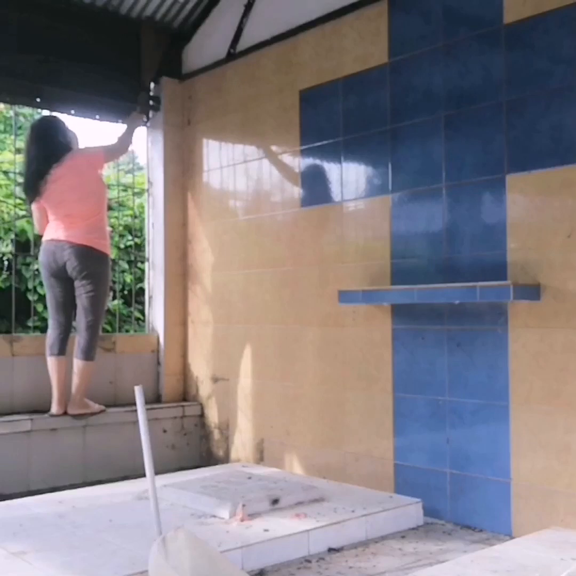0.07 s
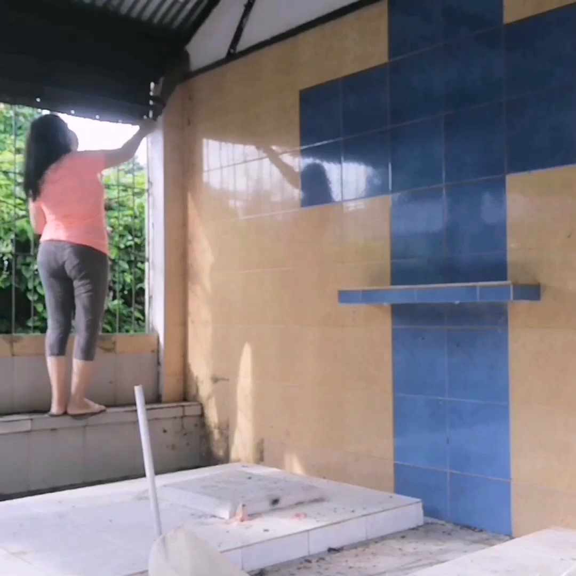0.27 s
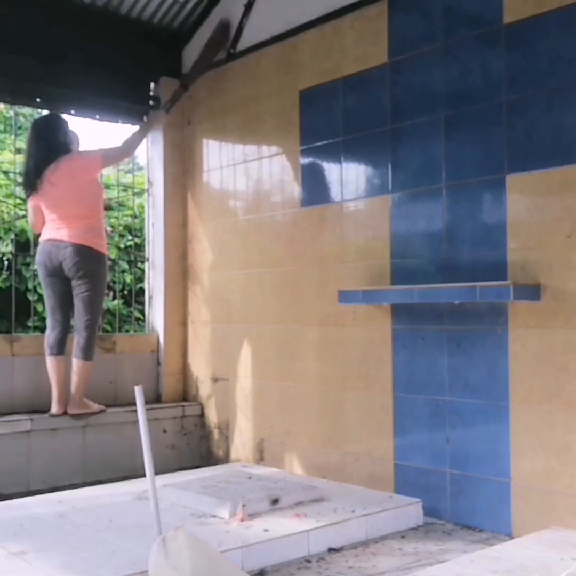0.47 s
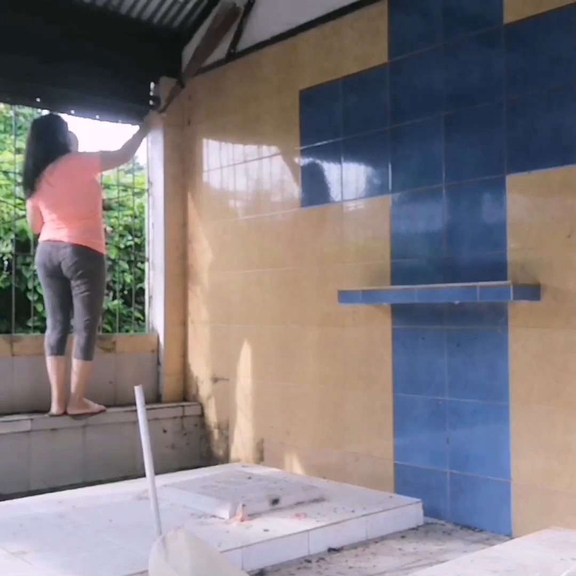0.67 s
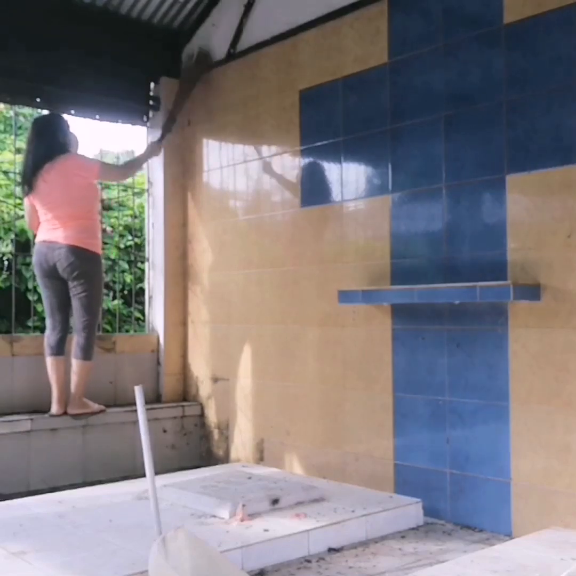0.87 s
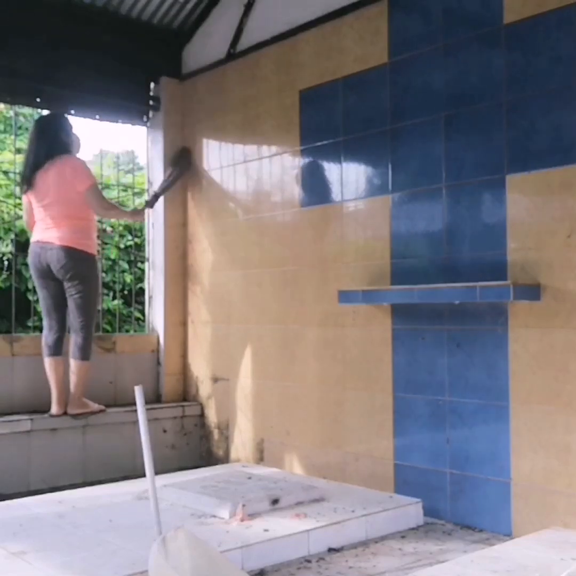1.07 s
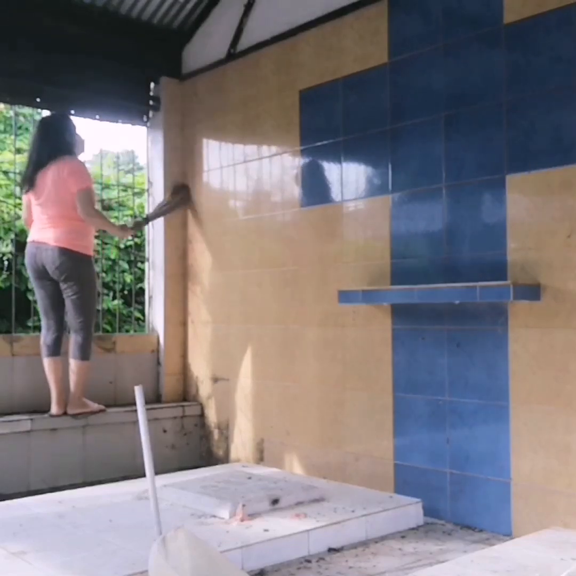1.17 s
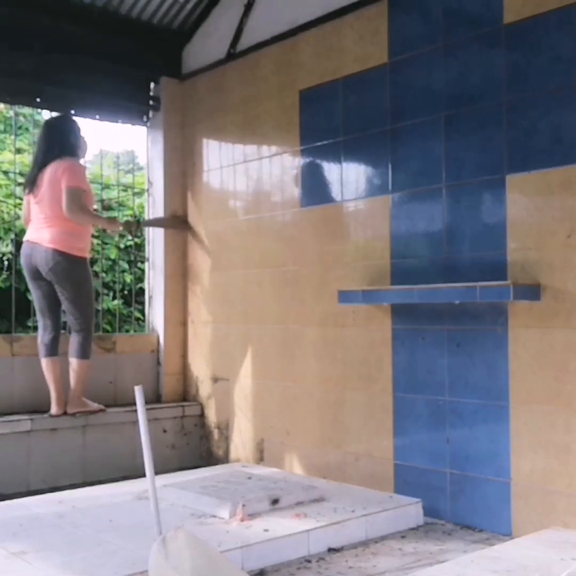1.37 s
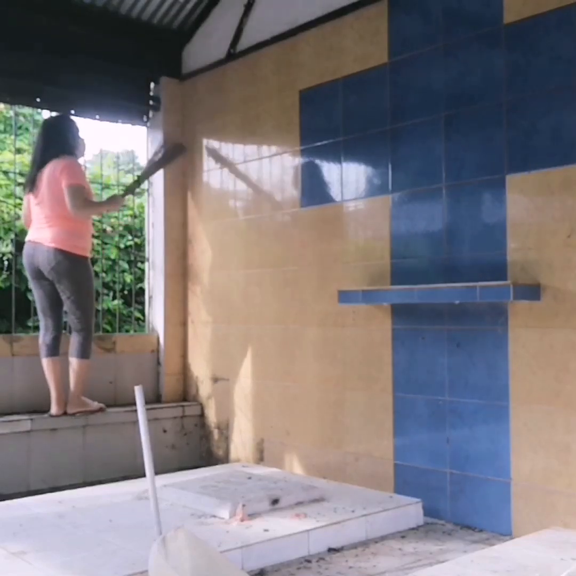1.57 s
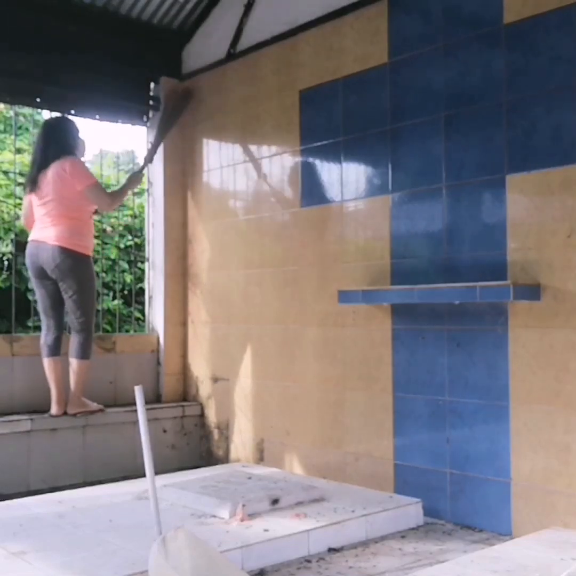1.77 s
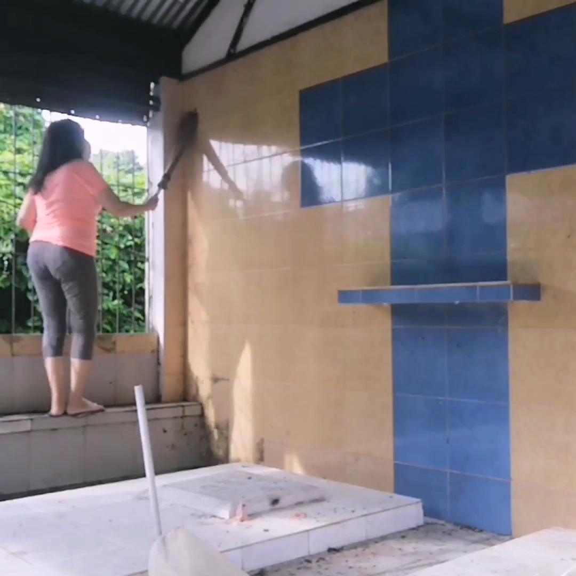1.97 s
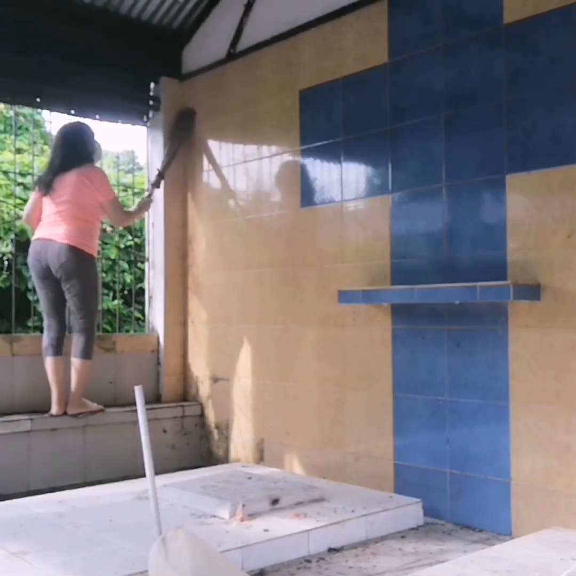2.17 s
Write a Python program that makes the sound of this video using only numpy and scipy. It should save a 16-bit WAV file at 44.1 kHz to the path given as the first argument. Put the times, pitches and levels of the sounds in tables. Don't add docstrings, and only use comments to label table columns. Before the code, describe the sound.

A long-handled straw broom brushes lightly, bumps woodenly, then scratches along a beam and wall top, slaps a pillar and drags faintly over tile; open-sided stone hall, a few metres from a stereo microphone pair, faint outdoor hum.

```python
import sys
import numpy as np
from scipy import signal
from scipy.fft import rfft, irfft
from scipy.io import wavfile
from scipy.ndimage import uniform_filter1d

SR = 44100
rng = np.random.default_rng(int(sys.argv[2]) if len(sys.argv) > 2 else 0)


def persist_wave(psi):
    counts = np.round(np.clip(psi, -1, 1) * 32767).astype(np.int16)
    wavfile.write(sys.argv[1], SR, np.atleast_2d(counts).T)


def attenuation_scalar(level_db):
    decades = np.asarray(level_db, float) / 20
    return 10 ** decades


N = 98343
T = np.arange(N) / SR


def level(x, db):
    return x * attenuation_scalar(db) / np.sqrt(np.mean(x ** 2))


def band(x, hz, width_hz):
    return signal.lfilter(*signal.iirpeak(hz, hz / width_hz, SR), x)


def lowpass(x, hz):
    return signal.sosfiltfilt(signal.butter(2, hz, fs=SR, output="sos"), x)


def colour(x, points):
    f = np.fft.rfftfreq(x.shape[-1], 1 / SR)
    hz, db = np.array(points, float).T
    gain = attenuation_scalar(np.interp(np.log(f + 1), np.log(hz), db))
    return irfft(rfft(x) * gain, x.shape[-1])


def walk(rate):
    k = int(SR / rate)
    held = np.repeat(rng.standard_normal(N // k + 1), k)
    return 1.3 * uniform_filter1d(uniform_filter1d(held, k), k)[:N]


def ports(x):
    low = lowpass(x, 680)
    same, apart = 0.9 * low[0], 0.36 * low[1]
    return x - low + same + apart * np.array([[1], [-1]])


# (frequency [Hz], level per Hz [dB])
AIR_COLOUR = [(25, -6.5), (110, -5), (260, -16), (940, -16), (1300, -27), (2300, -25), (3700, -29),
              (6500, -33.5), (9000, -34.5), (15400, -42)]


def outdoor_air():
    noise = rng.standard_normal((2, N))
    return level(ports(colour(noise, AIR_COLOUR)), -59.5) * attenuation_scalar(walk(7.7))


def traffic_rumble():
    noise = ports(rng.standard_normal((2, N)))
    return level(band(band(noise, 71, 100), 71, 100), -65)


def motor_hum():
    hum_hz, width_hz = 153.6, 130
    noise = rng.standard_normal(N)
    hum = level(band(band(noise, hum_hz, width_hz), hum_hz, width_hz), -76)
    pitch_hz = hum_hz + 1.6 * walk(10.1)
    strength = attenuation_scalar(-58.5 + 1.5 * walk(9.13))
    return hum + strength * np.sin(2 * np.pi * np.cumsum(pitch_hz) / SR)


def drone():
    return level(band(rng.standard_normal(N), 900, 51), -78.5) * attenuation_scalar(3.5 * walk(12.8))


# (time [s], length [s], start pitch [Hz], end pitch [Hz], level [dB])
BIRD_NOTES = [
    (1.92, 0.049, 1970, 1970, -69),
    (2.045, .025, 2000, 2250, -68),
    (2.087, 0.042, 866, 1000, -63),
    (2.123, 0.099, 2300, 2250, -67.5),
]


def birds():
    out = np.zeros(N)
    for s, length, from_hz, to_hz, db in BIRD_NOTES:
        u = np.clip((T - s) / length, 0, 1)
        pitch_hz = from_hz + (to_hz - from_hz) * u
        out += attenuation_scalar(db) * np.sin(np.pi * u) * np.sin(2 * np.pi * np.cumsum(pitch_hz) / SR)
    return out


def insects():
    hz, width_hz = 5050, 940
    from_s, rise_s, until_s, fall_s = 1.95, 0.096, 2.23, 0.1
    swell = np.clip(np.minimum((T - from_s) / rise_s, (until_s - T) / fall_s), 0.1, 1)
    noise = rng.standard_normal((2, N))
    return level(band(band(noise, hz, width_hz), hz, width_hz), -70.5) * swell


def outdoors():
    return outdoor_air() + traffic_rumble() + motor_hum() + drone() + birds() + insects()


def hall(x):
    t60_s, delay_s, shift_s = 0.18, 0.0025, 0.03
    t, hop = np.arange(int(0.4 * SR)) / SR, int(shift_s * SR)
    fade = attenuation_scalar(-60 * t / t60_s) * np.clip(t / delay_s, 0, 1)
    fade = fade / np.sqrt(np.sum(fade ** 2))
    window = np.sqrt(np.hanning(2 * hop))
    out, padded = np.zeros((2, N + SR)), np.pad(x, (hop, 2 * hop))
    for a in range(0, N + hop, hop):
        echo = ports(rng.standard_normal((2, len(t)))) * fade
        moment = padded[a:a + 2 * hop] * window
        part = signal.fftconvolve(moment[None], echo, axes=1)
        out[:, a:a + part.shape[1]] += part
    return out[:, hop:hop + N]


# (time [s], pitch [Hz], level
# [dB], fade [cycles per 60 dB])
BUMPS = [(0.152, 267, -54.5, 33), (.172, 280, -49, 15), (0.188, 356, -43.5, 12), (.198, 364, -41, 36),
         (0.223, 387, -53, 30), (0.226, 280, -42.5, 13), (0.251, 231.5, -42, 34), (.25, 665, -40.5, 31),
         (.265, 780, -40.5, 25), (.285, 680, -35, 20), (.32, 595, -42, 32), (.262, 315, -32.5, 7.1),
         (0.247, 107.4, -42.5, 20), (.272, 348, -33, 15), (.292, 432, -34.5, 29), (0.309, 86, -39.5, 18),
         (0.324, 236, -37.5, 16.5), (0.351, 109, -40, 17), (.375, 230, -41, 9.9), (0.396, 109, -39.5, 6.7),
         (0.476, 95, -44, 17), (.61, 105.5, -50.5, 16), (.47, 252, -51, 42), (.56, 319.5, -54.5, 72),
         (0.661, 293, -59.5, 33), (.895, 505, -53, 95), (.882, 720, -49, 53), (.85, 1588, -42.5, 150),
         (0.882, 1340, -46, 220), (0.901, 1740, -42.5, 390), (0.976, 1680, -56, 120),
         (1.041, 1532, -52, 120), (1.091, 1590, -60, 90), (.86, 280, -57, 52), (0.931, 225, -59, 130),
         (1.07, 330, -53, 23), (1.1, 230, -54.5, 19), (1.159, 330, -49.5, 28), (1.214, 575, -48, 70),
         (1.226, 562, -41, 145), (.3, 303, -43, 42), (1.305, 600, -49, 40), (1.358, 560, -52.5, 63),
         (1.242, 1610, -45, 126), (1.265, 2174, -51, 110), (1.371, 252, -58.5, 120), (1.47, 556, -65, 93),
         (1.49, 351, -66, 41), (.5, 1820, -44, 120), (.56, 1487, -45.5, 91), (0.781, 1137, -52.5, 120),
         (1.031, 230, -54.5, 27)]


def knocks():
    rise_share = 0.12
    out = np.zeros(N)
    for s, hz, db, cycles in BUMPS:
        a = int(s * SR)
        b = a + int(1.5 * cycles / hz * SR)
        turns = np.maximum(T[a:b] - s, 0) * hz
        rise = np.sin(np.pi / 2 * np.minimum(turns / (rise_share * cycles), 1)) ** 2
        out[a:a + len(turns)] += attenuation_scalar(db - 60 * turns / cycles) * rise * np.sin(2 * np.pi * turns)
    return out * attenuation_scalar(10.5)


def clicks(rate, spread_db):
    chance, sign, size = rng.random((3, N))
    slips = (chance < rate / SR) * np.sign(sign - 0.5)
    return level(slips * attenuation_scalar(-spread_db * np.log(size + 1e-4)), 0)


# (frequency [Hz], width [Hz], level [dB])
RAFTER_MODES = [(253, 55, -6), (485, 210, -3), (665, 76, 3.5), (906, 93, 2.5), (1160, 150, -3),
                (1760, 1400, -8.5)]
HANDLE_MODES = [(600, 200, -6.5), (880, 230, 5), (1240, 120, -3)]
BEAM_MODES = [(225, 160, -7), (444, 156, -3.5), (616, 190, -2), (1033, 350, -2.5), (1182, 242, 0),
              (2080, 1000, -9), (2895, 140, -5), (3200, 90, -9.5), (2220, 94, -7)]
WALL_TOP_MODES = [(230, 69, -12), (330, 38, 0), (505, 67, 4), (720, 73, 3.5), (887, 130, -1),
                  (1340, 140, -2.5), (1614, 90, -0.5), (1792, 87, -2), (2250, 210, -3.5), (2800, 150, -8.5)]
PILLAR_MODES = [(280, 90, -12.5), (446, 27, -5.5), (562, 59, -5), (810, 49, -7.5), (1200, 190, -15.5),
                (1652, 10.5, -3)]
TILE_MODES = [(1810, 530, -3), (2593, 700, -2.5), (3450, 760, -6)]
# (time [s], bristle level [dB], pressure [dB])
FIRST_TOUCH = [(0, -44.5, -8), (.012, -52.5, 2), (.072, -50.5, -7), (.1, -51.5, -4.5), (.15, -62, 1),
               (.19, -72, -3)]
HANDLE_LEAN = [(.16, -83, 26), (.184, -90, 27), (.196, -80, 28), (.21, -78.5, 23.6), (.24, -79, 32.2)]
BEAM_STROKE = [(.232, -67.5, 8.5), (.268, -42.5, -0.5), (.324, -39, -0.5), (.345, -43.5, 1.5),
               (.36, -39, -1), (.514, -41, -3), (.554, -36, -14), (.575, -44, -4.5), (.69, -51, -11)]
TOP_STROKE = [(.69, -52, -17), (.734, -41.5, -29), (.78, -39, -26), (.83, -36.5, -36), (.845, -32, -23),
              (.87, -36, -10.5), (.91, -37, -5), (.96, -42, -6.5), (1.166, -51, -4), (1.2, -62, -2)]
PILLAR_SLAP = [(1.205, -54, -1), (1.222, -30.5, -30), (1.24, -40.5, -6.5), (1.27, -37, -11),
               (1.3, -43.5, -12.5), (1.335, -43, -14.5), (1.352, -48, -11), (1.45, -59.5, -4)]
TILE_DRAG = [(1.45, -54.5, -27), (1.468, -52.5, -36), (1.55, -57.5, -33), (1.665, -59.5, -14),
             (1.685, -55, -19), (1.76, -57.5, -10), (1.845, -63.5, -26), (1.87, -57.5, -25),
             (1.98, -79, -23)]
LAST_TOUCH = [
    (2.19, -88, -25),
    (2.2, -70, -27),
    (2.214, -57.5, -37),
    (2.219, -48, -50),
    (2.23, -54, -37),
]
# (frequency [Hz], level per Hz [dB])
STRAW_COLOUR = [(180, -57), (300, -54), (950, -11.5), (1140, -10), (1460, -4.5), (2200, -2), (5620, -1),
                (9680, -2.5), (12500, -7.5), (15400, -12)]


def ring(x, modes):
    return sum((-1) ** k * attenuation_scalar(db) * band(x, hz, width) for k, (hz, width, db) in enumerate(modes))


def broom():
    straw = ports(np.array([level(colour(clicks(16000, 1.5), STRAW_COLOUR), 0) for _ in range(2)]))
    catches = ports(np.array([clicks(1500, 2.5) for _ in range(2)]))
    strokes = ((FIRST_TOUCH, RAFTER_MODES), (HANDLE_LEAN, HANDLE_MODES), (BEAM_STROKE, BEAM_MODES),
               (TOP_STROKE, WALL_TOP_MODES), (PILLAR_SLAP, PILLAR_MODES), (TILE_DRAG, TILE_MODES),
               (LAST_TOUCH, TILE_MODES))
    swish, crisp, body = 1e-6, 1e-6, 0
    for rows, modes in strokes:
        s, db, press_db = np.array(rows, float).T
        pressure_db = np.interp(T, s, press_db)
        stroke = attenuation_scalar(np.interp(T, s, db)) * ((T >= s[0]) & (T <= s[-1]))
        swish = swish + stroke
        crisp = crisp + stroke * attenuation_scalar(-0.16 * (pressure_db + 8.5))
        shaken = ring(catches * stroke * attenuation_scalar(pressure_db), modes)
        body = body + attenuation_scalar(3.5) / np.std(ring(catches, modes)) * shaken
    dull = lowpass(straw, 9100)
    light = (swish / attenuation_scalar(-55)) ** 0.05
    straw = dull + (straw - dull) * light * crisp / swish
    flutter = attenuation_scalar(1.2 * walk(40.2))
    return swish * straw * flutter, body


def scene():
    swish, body = broom()
    bumps = knocks()
    soft = signal.sosfilt(signal.butter(1, 6940, fs=SR, output="sos"), swish[0])
    soft = soft + attenuation_scalar(-1) * (swish[0] - soft)
    echoes = hall(attenuation_scalar(-3.5) * bumps + attenuation_scalar(1) * soft + attenuation_scalar(-2) * body[0])
    both = (swish + body + bumps + echoes) * attenuation_scalar(1.66) + outdoors()
    lag_s = 0.000109
    left = np.interp(np.arange(N) - lag_s * SR, np.arange(N), both[0])
    return np.array([left, both[1]])


def low_pass(x):
    return signal.sosfilt(signal.butter(12, 15500, fs=SR, output="sos"), x)


# (frequency [Hz], level [dB])
LEFT_COLOUR = [(60, -4.5), (140, -5.5), (300, -6.5), (600, -9), (1280, -3.5), (4370, -3), (8070, -7),
               (14900, 0)]


def record(dry):
    x = np.array([colour(dry[0], LEFT_COLOUR) * attenuation_scalar(-0.5), dry[1]])
    port_ring = (attenuation_scalar(2.5) - 1) * band(x, 9610, 860)
    notch = (attenuation_scalar(-5) - 1) * band(x, 8540, 580)
    x = x + port_ring + notch
    low = lowpass(x, 115)
    power = uniform_filter1d(np.mean((x - low) ** 2, axis=0), int(0.05 * SR))
    over_db = np.maximum(10 * np.log10(np.abs(power) + 1e-12) + 46, 0)
    x = x - low + low * attenuation_scalar(-0.6 * over_db)
    x = signal.sosfilt(signal.ellip(14, 0.2, 90, 15110, fs=SR, output="sos"), x)
    return low_pass(x)


dry = scene()
out = record(dry)
persist_wave(out)
```